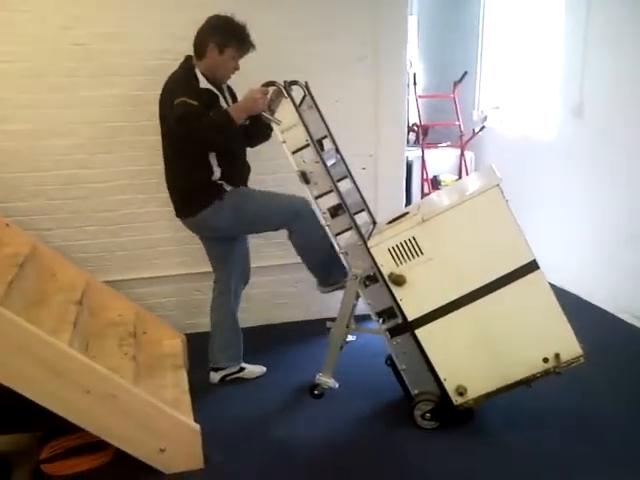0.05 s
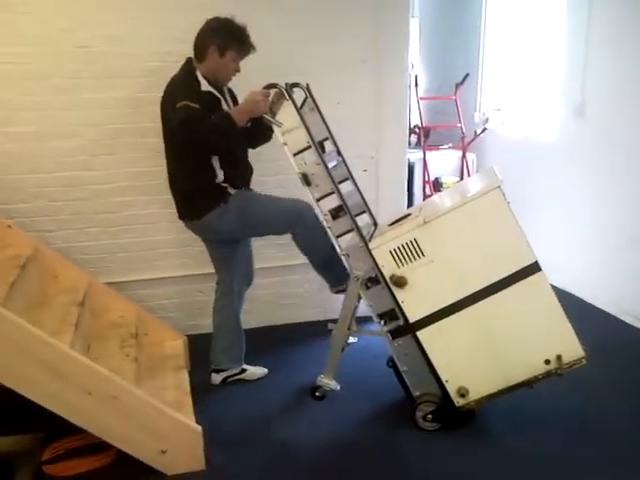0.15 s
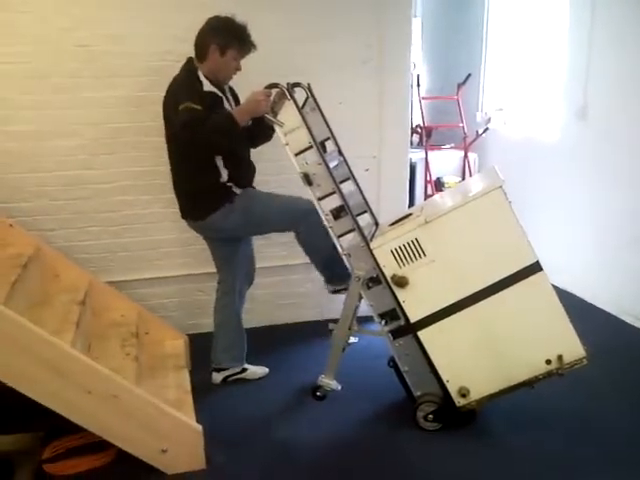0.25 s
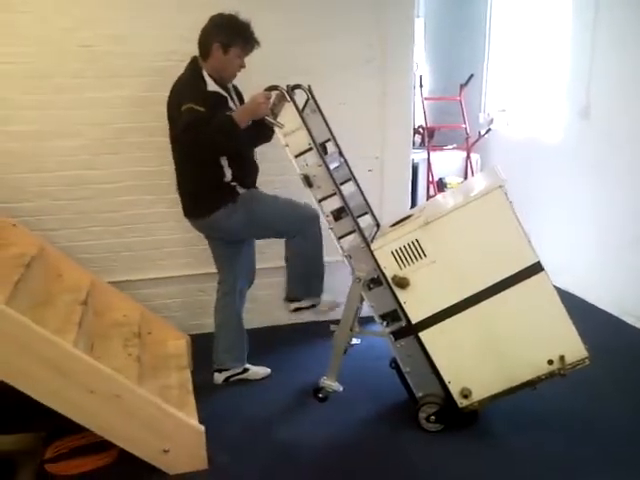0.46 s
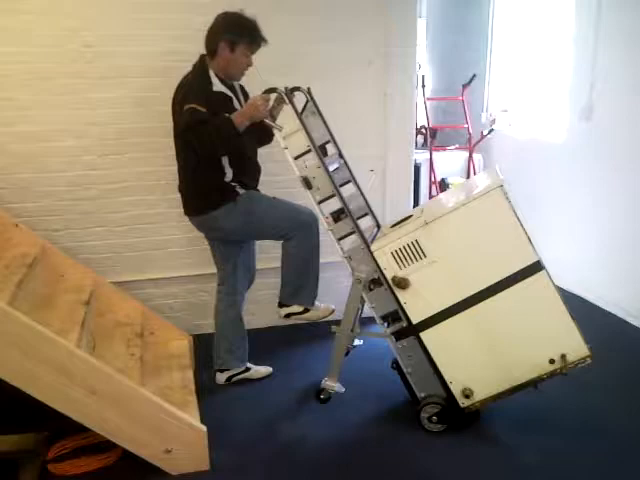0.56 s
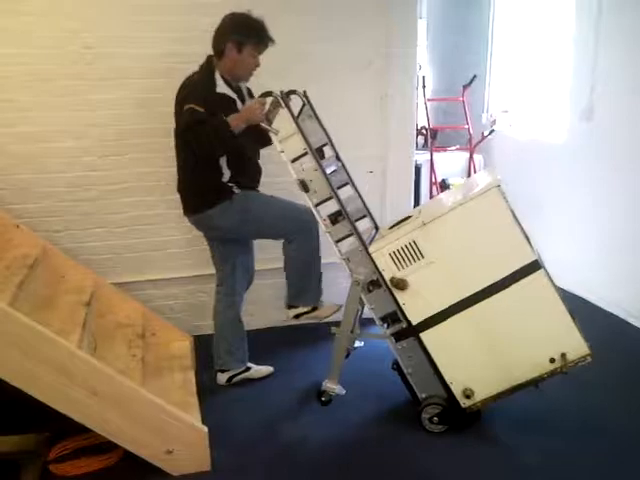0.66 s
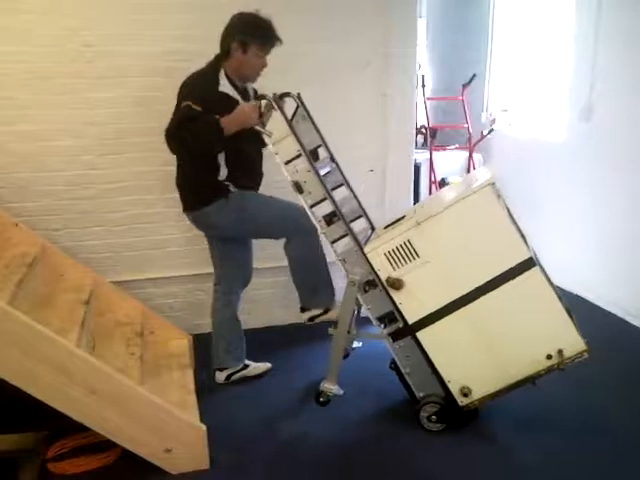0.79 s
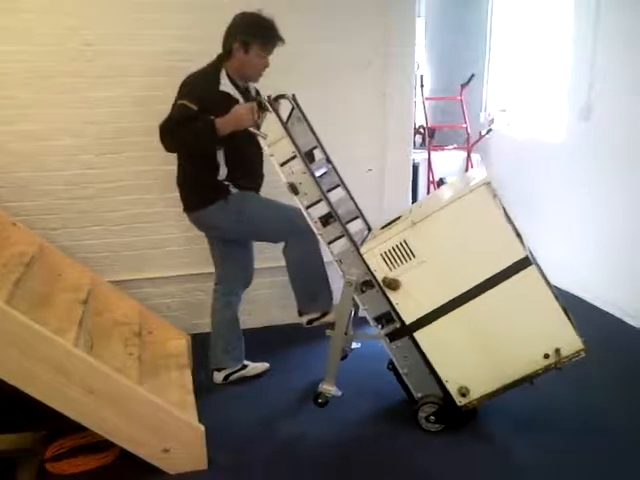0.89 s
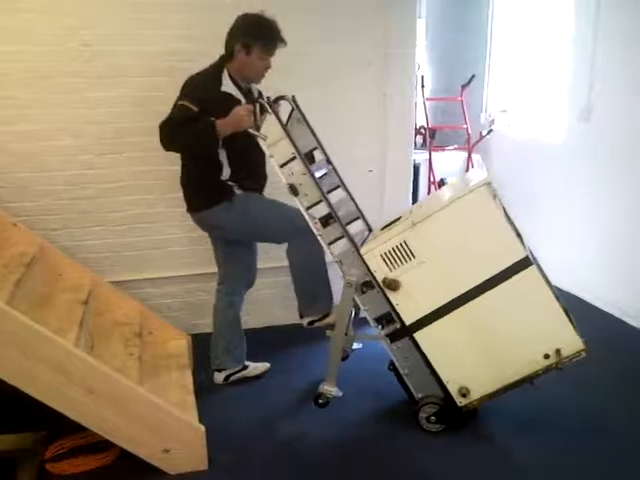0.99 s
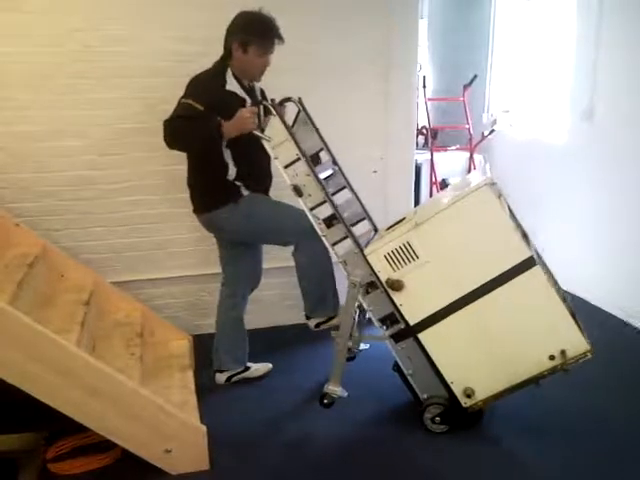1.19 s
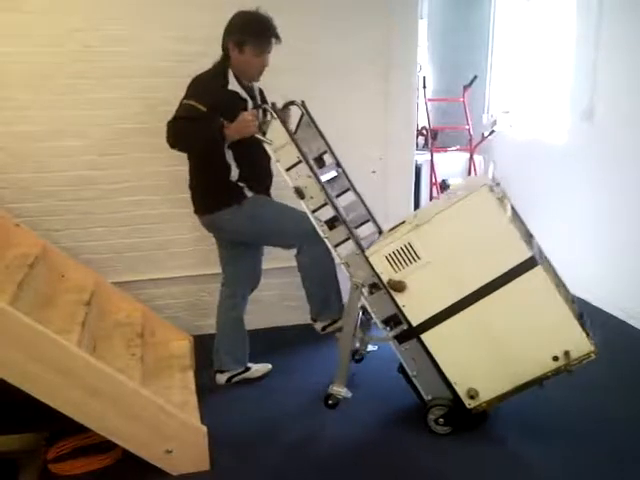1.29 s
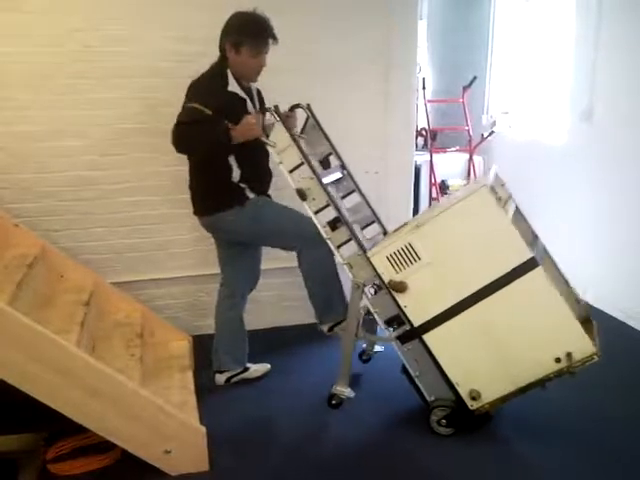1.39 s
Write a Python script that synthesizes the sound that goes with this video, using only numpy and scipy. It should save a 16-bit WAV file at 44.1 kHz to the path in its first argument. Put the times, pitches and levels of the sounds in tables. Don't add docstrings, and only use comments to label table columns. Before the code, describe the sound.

Quiet room hiss and faint floor thuds, then a hard metal latch snap with bright ringing tubes and a humming cabinet panel, later a softer double knock and shoe rub, heard through a dull-topped small microphone.

```python
import sys
import numpy as np
from scipy import signal
from scipy.fft import rfft, irfft
from scipy.io import wavfile
from scipy.ndimage import uniform_filter1d

SR = 44100
rng = np.random.default_rng(int(sys.argv[2]) if len(sys.argv) > 2 else 0)


def to_wav(s):
    ch = np.atleast_2d(s).T
    pcm = np.round(np.clip(ch, -1, 1) * 32767)
    wavfile.write(sys.argv[1], SR, pcm.astype(np.int16))


def decibels_to_gain(level_db):
    exponent = np.asarray(level_db, float) / 20
    return 10 ** exponent


N = 63945

# frequency in Hz, density in dB per Hz.
HISS_TONE = [(25, -17), (60, -4.5), (215, -9), (440, -15), (560, -20.5), (2400, -23.5), (5000, -31.5),
             (7200, -30), (8200, -43.5), (11000, -80)]
# frequency in Hz, t60 in seconds.
ROOM_DECAY = [(100, 1), (350, 1), (1000, 0.56), (2200, 0.56), (4000, 0.5), (6500, 0.31), (9000, 0.44)]
# start in seconds, pitch in Hz, level in dB, swell in seconds.
FLOOR_THUDS = [(.015, 108, -55, .025), (.145, 112, -50, .02), (.1, 62, -59, .02), (.207, 75, -52, .01),
               (.21, 140, -53, .03), (.265, 100, -48, .018), (.375, 70, -50, .025), (.46, 72, -51, .035),
               (.59, 70, -57, .025), (.69, 66, -58, .025), (.8, 62, -61, .04), (.885, 98, -52, .015),
               (.93, 88, -50, .04), (1.03, 83, -51, .035), (1.19, 64, -50, .03), (1.26, 108, -54, .04),
               (1.28, 60, -54, .025), (1.38, 62, -60, .03), (.94, 235, -53, .025), (.08, 226, -59, .025),
               (1.06, 170, -60, .03)]
# start in seconds, length in seconds, centre in Hz,
# width in Hz, level in dB.
RUBS = [(-.03, .18, 2250, 1000, -63), (1.3, .2, 750, 700, -63), (.88, .04, 1800, 1500, -60),
        (1.0, .38, 1300, 800, -57), (.9, .22, 300, 350, -52), (-.05, .25, 300, 250, -61),
        (.09, .015, 1250, 200, -60), (.182, .015, 1250, 200, -61), (.855, .2, 4200, 280, -65),
        (1.05, .45, 4050, 600, -68), (1.1, .2, 2450, 300, -68)]
# frequency in Hz, width in Hz, level in dB.
PANEL_MODES = [(385, 14, 0), (330, 25, -12), (412, 11, -9), (452, 9, -14)]
# frequency in Hz, level in dB, t60 in seconds.
TUBE_MODES = [(2210, -22, 0.62), (2390, -21, 0.55), (2250, -34, 0.38), (2525, -31, 0.53), (1077, -32, 0.67),
              (7070, -26.5, 0.43), (6920, -34.5, 0.55), (4643, -37.5, .35)]
# time in seconds, level in dB, contact in seconds.
STRUT_HITS = [
    (.893, -17.5, .001),
    (.9045, 5.5, 0.0006),
    (.911, -6.5, 0.00015),
    (.9165, -14, .0006),
    (.9203, 6, 0.00022),
    (.930, -25, 0.00071),
    (.9365, -7.5, 0.00081),
    (.968, -9, 0.001),
    (1.012, -18, 0.00017),
]
# frequency in Hz, width in Hz, level in dB.
STRUT_MODES = [(762, 35, -7.5), (1580, 39, -4.5), (2186, 150, -1.5), (2375, 44, -0.5), (2560, 100, -0.5),
               (3234, 33, -9), (3260, 6, -10), (3716, 54, -3), (4260, 30, -7), (3930, 44, -12)]
# frequency in Hz, density in dB per Hz.
STRUT_CLICK_TONE = [(59, -17), (100, -12), (410, 9.5), (645, -9), (779, -6.5), (1250, -4.5), (2190, -5),
                    (6910, -12), (9000, -44), (11700, -87), (19800, -120)]
# frequency in Hz, level in dB.
BAR_MODES = [(2072, -7.5), (2645, -4.5), (2480, -9.5), (1043, -22.5), (6650, -10), (6200, -28.5),
             (7160, -13), (3884, -20), (3259, -44.5)]
# time in seconds, level in dB, contact in seconds.
LATCH_HITS = [
    (.2002, -34, 0.00022),
    (.2017, -23.5, 0.00017),
    (.2052, -42.5, 0.00017),
    (.2066, -30, 0.00017),
    (.2076, 1, 0.000057),
    (.2175, -6, 0.0006),
]
# frequency in Hz, width in Hz, level in dB.
LATCH_MODES = [(1157, 68, -13), (1685, 9, -48.5), (2195.4, 29, 6), (2676, 67, 1), (2990, 60, -14.5),
               (3610, 20, -26), (3894, 29, -19), (4997, 110, -8.5), (6170, 42, -28.5), (6420, 510, -16),
               (6900, 35, -18), (6210, 58, -6), (7023, 28, 0.5)]
# frequency in Hz, width in Hz, level in dB.
FRAME_MODES = [(1061, 19, -11.5), (1530, 110, -24), (2090, 78, -4.5), (2167, 15, 9.5), (2343, 73, -11.5),
               (3090, 140, -5.5), (3680, 58, -15.5), (4550, 43, -10), (4270, 86, -29.5), (6410, 51, -23.5),
               (7180, 20, -21.5), (6750, 81, 2)]
# frequency in Hz, density in dB per Hz.
LATCH_CLICK_TONE = [(100, -34.5), (380, -24), (600, -28), (1050, -17), (1300, -17.5), (2200, -10),
                    (5100, -20.5), (6700, -11.5), (7600, -18.5), (9000, -32.5), (12000, -70.5)]

TIME = np.arange(N) / SR
BAR_START_S = .2056


def level(x, db):
    return x * decibels_to_gain(db) / np.sqrt(np.mean(x ** 2))


def band(x, hz, width):
    return signal.lfilter(*signal.iirpeak(min(hz, .45 * SR), hz / width, fs=SR), x)


def colour(x, table):
    f, table = np.linspace(1, SR / 2, 1025), np.array(table)
    gain_db = np.interp(np.log(f), np.log(table[:, 0]), np.maximum(table[:, 1], -70))
    cepstrum = irfft(gain_db * np.log(10) / 20)
    cepstrum[1:1024] *= 2
    cepstrum[1025:] = 0
    return signal.fftconvolve(x, irfft(np.exp(rfft(cepstrum))))[:N]


def walk(rate):
    hold = int(SR / rate)
    steps = np.repeat(rng.standard_normal(N // hold + 1), hold)
    return uniform_filter1d(steps, hold)[:N]


def swell(start, rise):
    u = np.maximum(TIME - start, 0) / rise
    return u * np.exp(1 - u)


def struck(blows, modes, damp, click_tone, click_db, rattle_db, peak_db):
    push, rattle, ring = 0, 0, 0
    for s, db, contact in blows:
        push = push + decibels_to_gain(db) / contact * np.exp(-.5 * ((TIME - s) / (contact / 4)) ** 2)
        rattle = rattle + decibels_to_gain(db) * swell(s, .006)
    rattle = rattle * rng.standard_normal(N)
    for k, (hz, width, db) in enumerate(modes):
        ring = ring + (-1) ** k * decibels_to_gain(db) / np.sqrt(width) * band(push, hz, width * damp)
    click = colour(level(push, 0) + level(rattle, rattle_db), click_tone)
    out = level(ring, 0) + level(click, click_db)
    return out * decibels_to_gain(peak_db) / np.abs(out).max()


def room_hiss():
    noise = rng.standard_normal(N) * decibels_to_gain(walk(4.8))
    return level(colour(noise, HISS_TONE), -57)


def room(x):
    table, tail = np.array(ROOM_DECAY), 0
    for hz in 50 * 2 ** np.arange(0, 8, .5):
        t60 = np.interp(np.log(hz), np.log(table[:, 0]), table[:, 1])
        tail = tail + band(rng.standard_normal(N), hz, hz / 2.5) * decibels_to_gain(-60 * TIME / t60)
    tail = tail * (1 - np.exp(-TIME / .005))
    return signal.fftconvolve(x, tail / np.sqrt(np.sum(tail ** 2)))[:N]


def thuds():
    out = 0
    for s, hz, db, rise in FLOOR_THUDS:
        pitch = hz * (1 + 0.019 * walk(18))
        out = out + decibels_to_gain(db + 7) * swell(s, rise) * np.sin(2 * np.pi * np.cumsum(pitch) / SR)
    return out


def scuffs():
    out = 0
    for s, length, hz, width, db in RUBS:
        grain = rng.standard_normal(N) * decibels_to_gain(-1.5 * walk(60))
        rub = level(band(band(grain, hz, width), hz, 2.3 * width), db)
        out = out + rub * np.sin(np.pi * np.clip((TIME - s) / length, 0, 1)) ** 0.27
    return out


def panel():
    out = 0
    for hz, width, db in PANEL_MODES:
        out = out + decibels_to_gain(db) * swell(.219, .026 * 14 / width) * np.sin(2 * np.pi * hz * TIME)
    return decibels_to_gain(-29) * out


def tubes():
    u, out = np.maximum(TIME - BAR_START_S, 0), 0
    for hz, db, t60 in TUBE_MODES:
        flutter_db = 4 * walk(30)
        out = out + decibels_to_gain(db - 60 * u / t60 + flutter_db) * np.sin(2 * np.pi * hz * u)
    return (1 - np.exp(-u / .041)) * out


def strut_knock():
    return struck(STRUT_HITS, STRUT_MODES, damp=1.5, click_tone=STRUT_CLICK_TONE,
                  click_db=-5.5, rattle_db=12, peak_db=-27.5)


def bar():
    rise_s, t60_s, seats_s, stop_s = .0024, .12, .2205, .004
    u = np.maximum(TIME - BAR_START_S, 0)
    shape = (1 - np.exp(-(u / rise_s) ** 2)) * decibels_to_gain(-60 * u / t60_s)
    shape = shape * np.exp(-np.maximum(TIME - seats_s, 0) / stop_s)
    return shape * sum(decibels_to_gain(db) * np.sin(2 * np.pi * hz * u) for hz, db in BAR_MODES)


def latch_clank():
    latch = struck(LATCH_HITS, LATCH_MODES, damp=2.5, click_tone=LATCH_CLICK_TONE,
                   click_db=1, rattle_db=-5, peak_db=4.5)
    frame = struck(LATCH_HITS, FRAME_MODES, damp=3, click_tone=LATCH_CLICK_TONE,
                   click_db=-10, rattle_db=-5, peak_db=-1)
    return latch + frame


def scene():
    clank = latch_clank()
    knock = strut_knock()
    hiss = room_hiss()
    hum = panel()
    wet = decibels_to_gain(.5) * room(clank + decibels_to_gain(-1) * knock + decibels_to_gain(-22) * hum)
    background = hiss + thuds() + scuffs()
    metal = decibels_to_gain(-12) * clank + bar() + tubes() + knock
    return (background + hum + wet + metal)[None]


def roll_off(x):
    return signal.sosfilt(signal.butter(12, 15940, fs=SR, output="sos"), x)


def record(dry):
    clip = .8
    x = clip * np.tanh(dry / clip)
    x = signal.sosfilt(signal.cheby2(6, 36, 9300, fs=SR, output="sos"), x)
    x = signal.sosfilt(signal.ellip(8, .5, 70, 9100, fs=SR, output="sos"), x)
    x = signal.sosfilt(signal.butter(1, 45, "high", fs=SR, output="sos"), x)
    top = .915 * np.abs(x).max()
    return roll_off(np.clip(x, -top, top))


dry = scene()
out = record(dry)
to_wav(out)
```